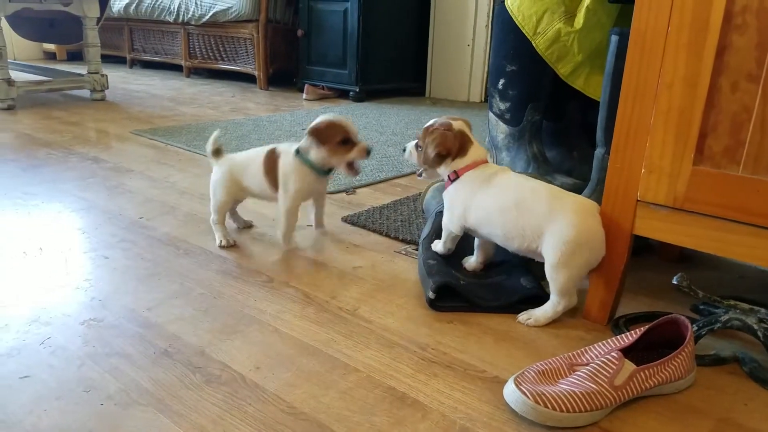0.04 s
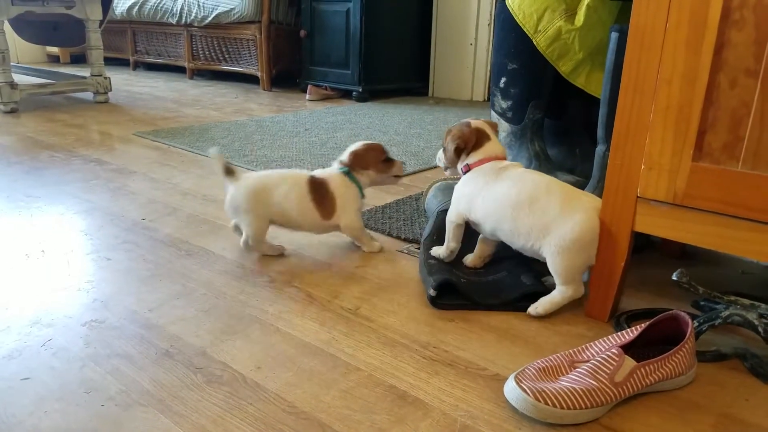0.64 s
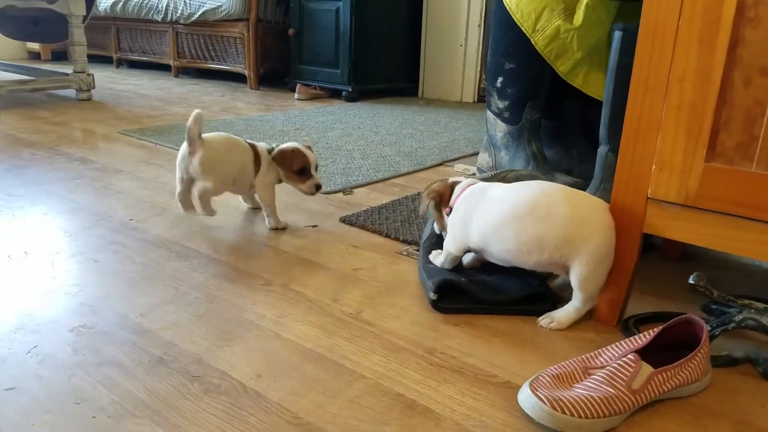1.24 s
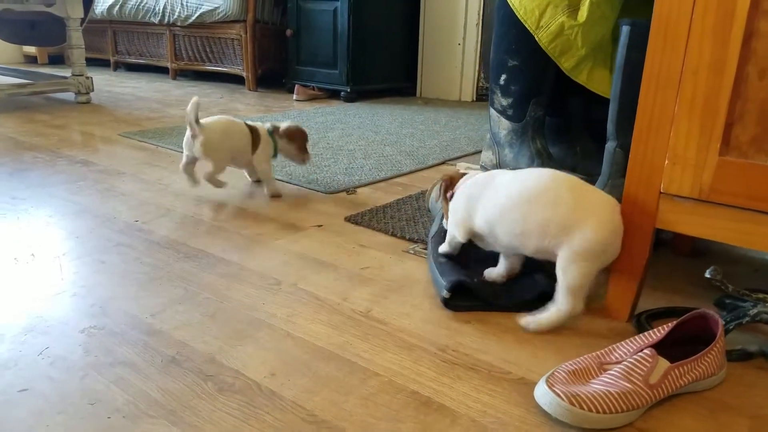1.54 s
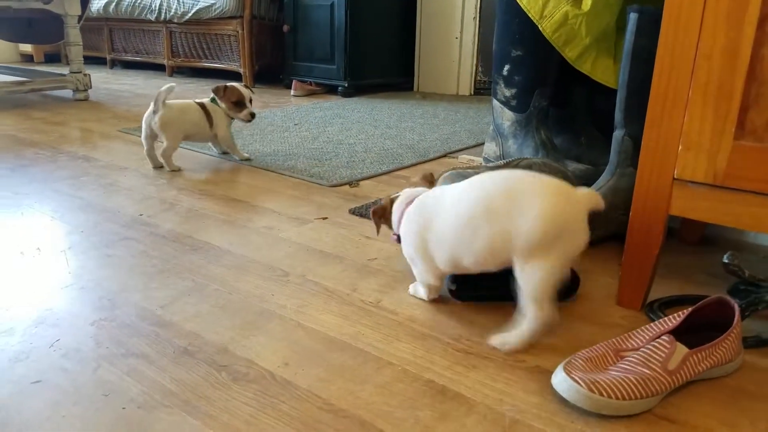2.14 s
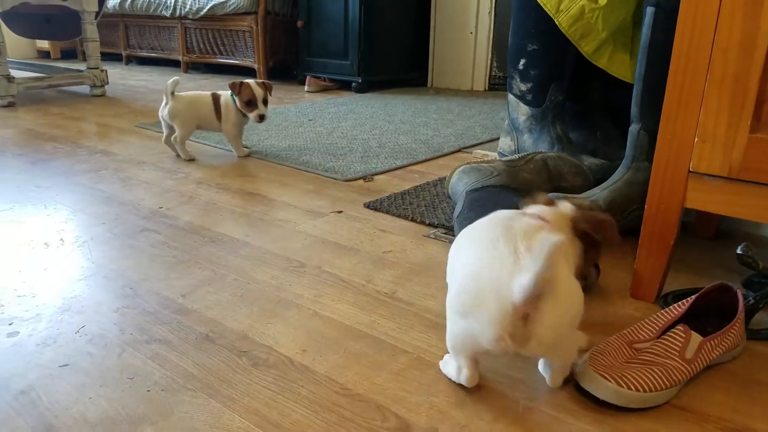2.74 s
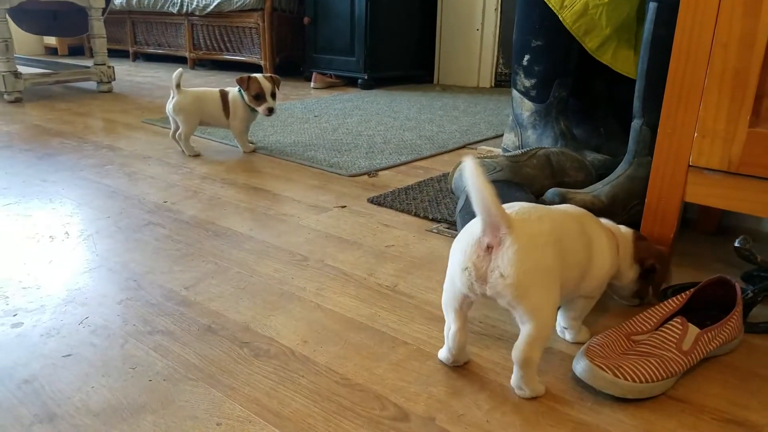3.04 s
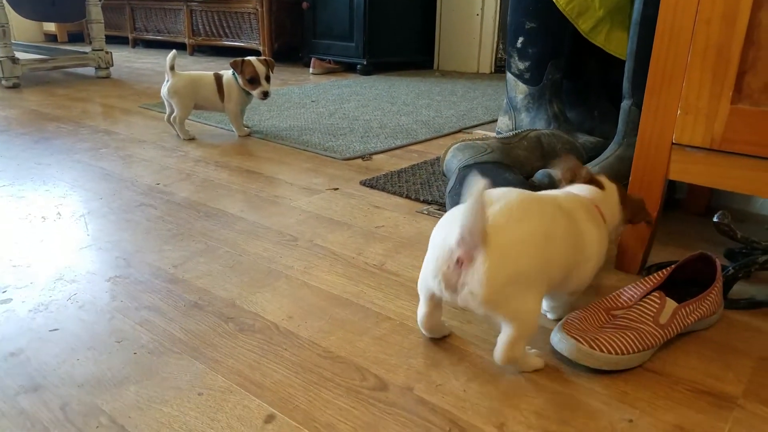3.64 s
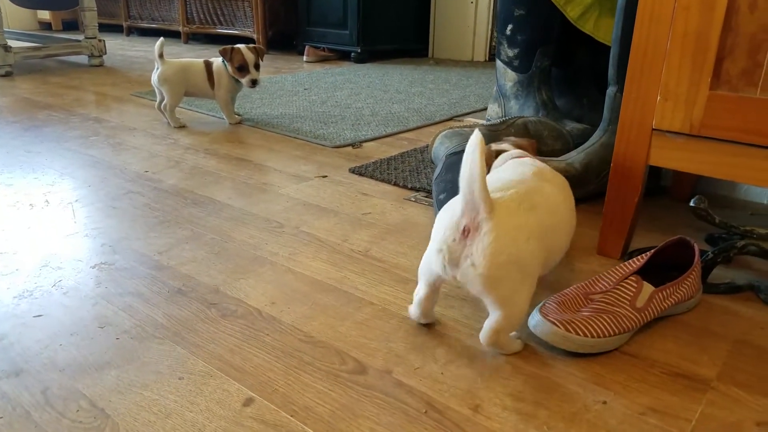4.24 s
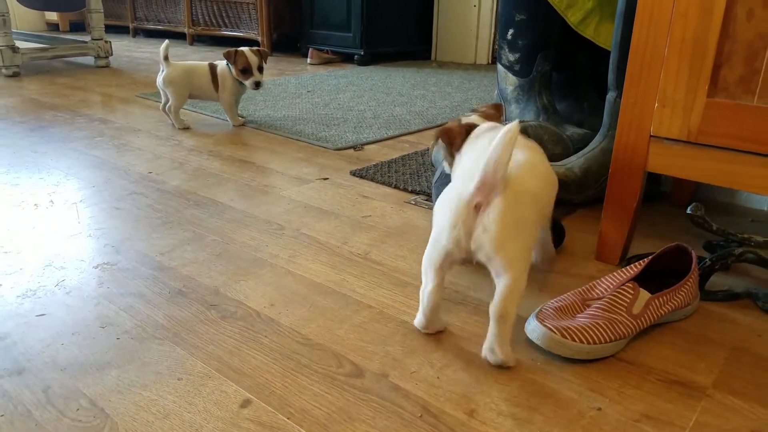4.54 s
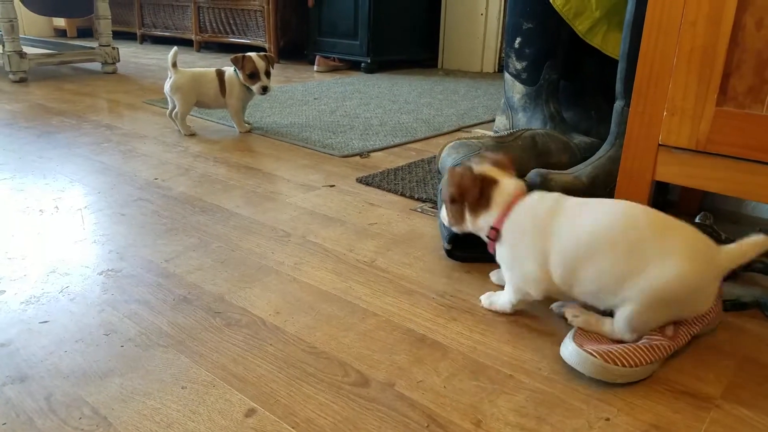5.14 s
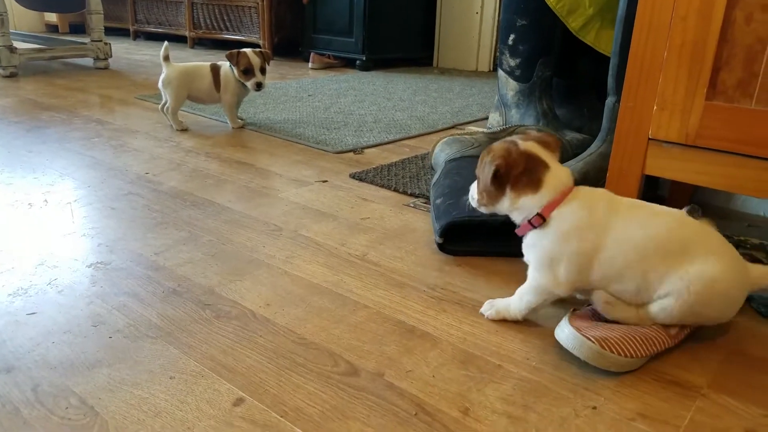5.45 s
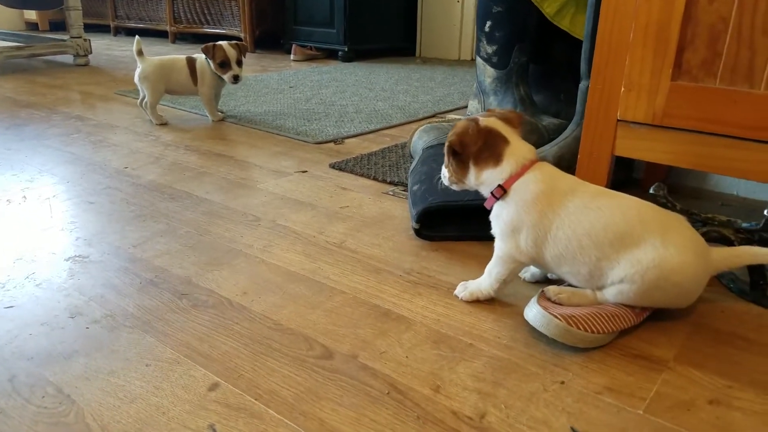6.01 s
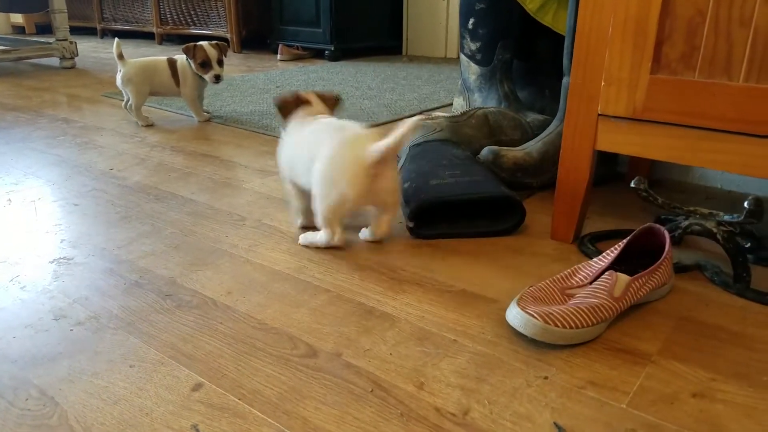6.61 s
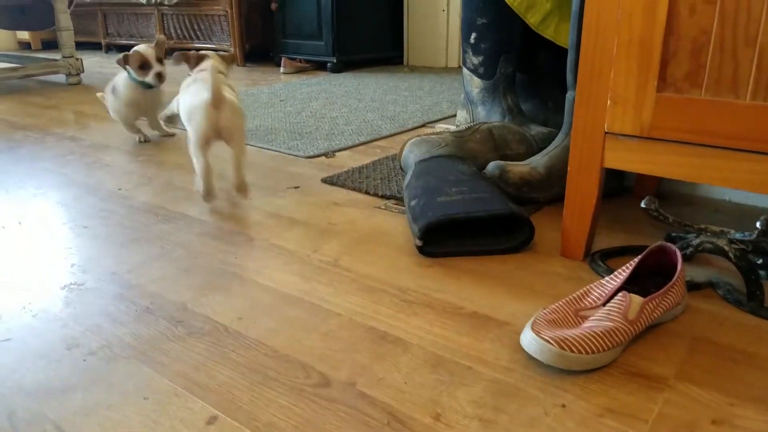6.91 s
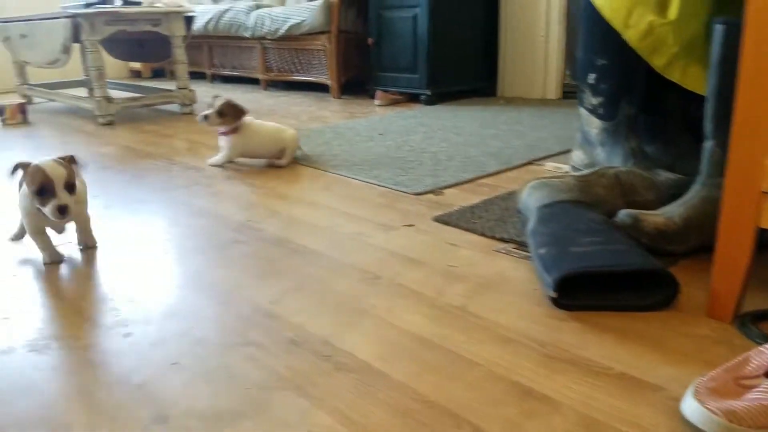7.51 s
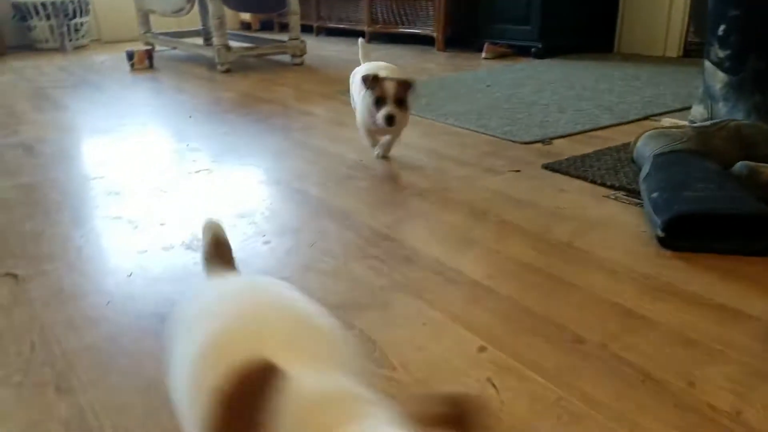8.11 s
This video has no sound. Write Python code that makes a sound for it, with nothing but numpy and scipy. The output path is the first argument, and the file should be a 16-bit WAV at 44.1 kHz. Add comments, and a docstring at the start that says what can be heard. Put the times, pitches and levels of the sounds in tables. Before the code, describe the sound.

Close, uneven paw taps and hollow thuds come from two puppies scuffling on floorboards in a small, faintly humming room. Brief claw scratches and hissy slides fall between the steps, broken by short lulls. Toward the end the puppies run and the pattering grows denser, a collar ring chinks, and clothing or a hand rustles against the microphone in soft swells.

```python
"""Two puppies on a laminate floor

They scuffle, then gallop, in a small room, close to a hand-held phone. Soft paws knock the boards and
make the floating floor boom. Paws and coats slide with a short grainy hiss; claws tick and scratch.
A collar ring chinks. Late on, clothing or a hand on the phone rustles in longer swells.
The room adds a short tail and a faint low hum."""
import sys
import numpy as np
from scipy import signal
from scipy.fft import rfft, irfft, next_fast_len
from scipy.io import wavfile
from scipy.ndimage import map_coordinates

SR = 44100
rng = np.random.default_rng(int(sys.argv[2]) if len(sys.argv) > 2 else 0)


def inscribe(sig):
    """Save sig as 16-bit PCM at rate SR to the path in sys.argv[1].

    A 1-D sig is mono; a 2-D sig holds one channel per row.
    Samples are clipped to [-1, 1] before scaling.
    """
    pcm = np.round(np.clip(np.atleast_2d(sig).T, -1, 1) * 32767)
    wavfile.write(sys.argv[1], SR, pcm.astype(np.int16))


N = 364703
T = np.arange(N) / SR

# Noise spectra. Each row: frequency in Hz, relative density in dB.
HUM_SPECTRUM = [(20, -50), (45, -9), (62, 6.5), (85, -14), (120, 5), (160, -5.5), (310, -3), (520, -8.5),
                (1200, -14.5), (2500, -20.5), (7000, -43), (15000, -29)]
RUSTLE_SPECTRUM = [(150, -13), (550, 20), (1200, 13.5), (2500, 15), (4500, 12.5), (6500, 7), (15000, 1)]
RUMBLE_SPECTRUM = [(20, -39), (42, 14), (85, 10.5), (200, -7), (500, -10.5), (1500, -14)]
CLAW_SPECTRUM = [(150, -34.5), (600, 14.5), (1500, 6.5), (3500, 9), (7500, 2), (15000, -0.5)]
# Bouts of play. Each row: start and end in seconds, rustle in dB, weight on the floor in dB,
# lag of the left microphone port in samples.
PLAY_BOUTS = [(0.153, 0.388, -63.5, -65.5, 12), (0.598, 0.73, -67, -69.5, -3),
              (1.423, 1.672, -63.5, -59, 4.5), (1.76, 1.874, -74, -59.5, 2.5), (2.29, 2.57, -59, -60, 6),
              (3.686, 4.394, -72, -75, -0.5), (4.678, 4.835, -51.5, -56, 8), (5.13, 5.195, -55.5, -59.5, 7),
              (6.37, 6.365, -53, -63, 5), (6.664, 6.68, -52.5, -54.5, 1.5), (7.013, 7.322, -52, -48, -2.5),
              (7.434, 8.29, -54, -51, 8.5)]
# Firm paw falls. Each row: time in seconds, knock level in dB, pitch in Hz, plank decay in cycles.
FIRM_PAWS = [(.142, -33.5, 1170, 1.2), (.323, -36, 990, 1.2), (.56, -37, 780, 0.81), (.726, -46, 486, 2.3),
             (1.2, -50, 472, 1.7), (1.444, -28.5, 468, 1.2), (1.483, -43.5, 564, 4.7),
             (1.62, -32.5, 660, 1.8), (1.648, -49, 775, 1.2), (1.719, -38.5, 490, 0.73),
             (2.265, -29, 740, 1.5), (2.464, -26, 286, 2), (2.494, -39, 760, 0.99), (2.536, -39, 298, 0.7),
             (2.588, -39.5, 303, 0.67), (3.739, -45.5, 334, 0.96), (4.487, -36.5, 376, 0.36),
             (4.697, -34.5, 261, 1.1), (4.74, -28.5, 670, 1.5), (5.101, -32.5, 570, 0.57),
             (5.168, -32, 704, 1.8), (5.319, -59, 196, 1.3), (6.28, -33.5, 189, 0.51),
             (6.61, -30.5, 760, 1.7), (6.644, -26.5, 189, 0.48), (6.672, -36, 655, 2.1),
             (6.688, -27.5, 754, 0.95), (6.85, -35, 535, 3.4), (6.929, -38, 483, 2.2),
             (7.075, -67, 326, 1.2), (7.11, -46, 506, 2.8), (7.204, -27, 532, 5.1),
             (7.432, -36.5, 597, 0.49), (7.649, -43.5, 407, 0.99), (8.018, -32.5, 640, 0.63),
             (8.053, -29, 730, 0.83), (8.056, -27.5, 151, 1.3), (8.083, -35, 535, 2.7),
             (8.109, -30, 674, 0.72), (8.234, -39.5, 483, 2.7), (8.257, -36.5, 750, 1.3)]
# Floating floor modes. Each row: frequency in Hz, relative level in dB, T60 in seconds.
FLOOR_MODES = [(52, -13, 0.23), (78.8, -11, 0.14), (113, -4, 0.096), (137.5, -11, 0.12),
               (174.4, -8.5, 0.17), (201, -16, 0.17), (308, -5.5, 0.041)]
# Hissing swells: short paw and coat slides, and longer rustles of clothing or a hand on the phone.
# Each row: peak time in seconds, level in dB, swell in seconds, hiss centre in Hz.
HISS_SWELLS = [(0.136, -49, 0.008, 2000), (0.193, -48, 0.0073, 7860), (0.366, -50, 0.0096, 5500),
               (.904, -57.5, 0.03, 7200), (1.24, -58.5, 0.024, 7300), (1.475, -55, 0.027, 11900),
               (2.011, -53.5, 0.019, 2290), (2.35, -42, 0.014, 9400), (2.398, -43.5, 0.0048, 5040),
               (2.458, -42.5, 0.0031, 1000), (2.809, -50.5, 0.019, 4900), (2.934, -60, 0.037, 3050),
               (3.77, -49, 0.0088, 3060), (3.908, -54.5, 0.004, 2970), (4.098, -53.5, 0.012, 3360),
               (4.269, -50, 0.014, 3340), (4.545, -53, 0.014, 1140), (4.653, -39, 0.012, 3700),
               (5.013, -43, 0.012, 3520), (5.171, -40, 0.015, 1850), (5.506, -53.5, 0.015, 2080),
               (6.225, -44.5, 0.01, 4440), (6.36, -51, 0.033, 1170), (6.425, -46, 0.011, 1350),
               (6.507, -43.5, 0.0042, 6850), (6.777, -44, 0.0071, 8040), (6.98, -48.5, 0.044, 3300),
               (7.071, -45.5, 0.043, 2560), (7.215, -44.5, 0.037, 4300), (7.371, -50, 0.023, 3800),
               (7.576, -51.5, 0.04, 4400), (7.775, -47, 0.039, 2800), (7.962, -44, 0.043, 9400)]
# Claw strikes. Each row: start in seconds, level in dB, length in seconds, added tilt in dB per octave.
CLAW_STRIKES = [(0.292, -51, 0.0042, -2), (.32, -46, 0.004, 1), (0.455, -52, 0.0025, 6),
                (1.433, -48, 0.0011, 1), (2.09, -41.5, 0.0077, 1), (2.242, -40.5, 0.00089, 0.9),
                (2.2627, -31.5, 0.0019, 2.5), (2.492, -35, 0.0033, -0.5), (2.673, -55.5, 0.0035, 2),
                (2.839, -44.5, 0.0037, 1.6), (3.047, -59.5, 0.01, 0.5), (3.861, -51, 0.0017, 1.5),
                (4.486, -41.5, 0.0041, 0), (4.66, -35, 0.0047, 6.5), (4.776, -39.5, 0.0039, 1.5),
                (5.197, -39, 0.0042, 5.5), (5.557, -48, 0.0068, 0.5), (6.275, -38.5, 0.0029, 0),
                (6.605, -30.5, 0.0024, 5.5), (6.716, -45, 0.0069, 4), (6.864, -49, .003, 0),
                (7.165, -42, .004, 0), (7.263, -38.5, 0.0015, -0.5), (7.5194, -44, 0.0012, 2.5),
                (7.8596, -41.5, 0.0062, -0.4), (7.918, -41, 0.0055, 0), (7.954, -42, 0.0015, -0.5),
                (8.001, -31.5, 0.012, 10), (8.0132, -32, 0.0048, 6.5), (8.111, -38, 0.0017, 1),
                (8.131, -38.5, 0.0027, .5), (8.226, -44.5, 0.0055, 0)]
# Collar ring jolts. Each row: start in seconds, level in dB.
COLLAR_CHINKS = [(6.78, -59), (7.714, -34)]
# Colour of the two ports. Each row: frequency in Hz, left minus right in dB.
PORT_COLOUR = [(200, -1), (700, 0.5), (2380, -1.5), (4400, 4), (8120, 1), (15000, 1.5)]


def amp(db):
    """Decibels to gain."""
    return 10 ** (np.asarray(db) / 20)


def unit(x):
    """Scale to rms 1."""
    return x / np.sqrt(np.mean(x ** 2))


def decay(t, t60_s):
    """Fall of 60 dB per t60_s."""
    return np.exp(-np.log(1000) * t / t60_s)


def add(track, start_s, sound):
    """Mix a sound into a track."""
    i = int(start_s * SR)
    sound, i = sound[max(-i, 0):], max(i, 0)
    track[i:i + len(sound)] += sound[:N - i]


def curve_db(points, size):
    """(Hz, dB) points to FFT bins, over log frequency."""
    hz, db = np.transpose(points)
    bin_hz = np.maximum(np.arange(size // 2 + 1) * SR / size, 1)
    return np.interp(np.log(bin_hz), np.log(hz), db)


def colour(x, spectrum):
    """Shape noise by (Hz, dB) points, to rms 1."""
    n = x.shape[-1]
    size = next_fast_len(n)
    return unit(irfft(rfft(x, size) * amp(curve_db(spectrum, size)), size)[..., :n])


def diffuse(n, apart_hz=1100):
    """Noise from all sides at two close ports: alike in the bass, unrelated in the treble."""
    mid, side = rfft(rng.standard_normal((2, n)))
    hz = np.arange(len(mid)) * SR / n
    coherence = .94 / (1 + (hz / apart_hz) ** 2)
    mid, side = mid * np.sqrt(1 + coherence), side * np.sqrt(1 - coherence)
    return irfft([mid + side, mid - side], n) / np.sqrt(2)


def friction(n, grain_db, grain_hz=700):
    """Tiny catches and slips: noise whose level jumps from grain to grain."""
    grain = (np.arange(n) * grain_hz / SR).astype(int)
    return unit(rng.standard_normal(n) * amp(grain_db * rng.standard_normal(n))[grain])


def activity(at_s, rest_db=-76.5, attack_s=.07, release_s=.18):
    """Rustle and weight in dB: each bout starts quickly and ebbs to rest."""
    start_s, end_s, rustle_db, weight_db, _ = np.transpose(PLAY_BOUTS)
    t = np.asarray(at_s)[..., None]
    envelope = np.exp(-np.maximum(start_s - t, 0) / attack_s - np.maximum(t - end_s, 0) / release_s)
    return [20 * np.log10(amp(rest_db) + (amp(db) * envelope).max(axis=-1))
            for db in (rustle_db, weight_db)]


def hum(level_db=-62.5):
    """Steady low room noise from all sides."""
    return amp(level_db) * colour(diffuse(N), HUM_SPECTRUM)


def scurry(rustle_gain_db=2, rumble_gain_db=-5.5, patter_db=3, tremble_db=5.5):
    """Pattering and brushing coats rustle between steps and keep the floor trembling."""
    rustle_db, weight_db = activity(T)
    knots_s = np.arange(0, T[-1], .025)
    patter = np.interp(T, knots_s, rng.standard_normal(len(knots_s)))
    grains = np.array([friction(N, grain_db=2, grain_hz=302.7) for _ in "LR"])
    rustle = colour(grains, RUSTLE_SPECTRUM) * amp(rustle_gain_db + patter_db * patter)
    rumble = colour(diffuse(N), RUMBLE_SPECTRUM) * amp(rumble_gain_db + tremble_db * patter)
    return amp(rustle_db) * rustle + amp(weight_db) * rumble


def footfalls(steps_per_s=12, step_hz=430, spread_db=7.5, spread_octaves=.61):
    """Firm falls plus irregular light steps. Each row: seconds, knock dB, Hz, decay cycles, boom dB."""
    count = int(steps_per_s * T[-1])
    jitter, force, pitch = rng.standard_normal((count, 3)).T
    light_s = np.clip((np.arange(count) + jitter / 2) / steps_per_s, 0, T[-1])
    rustle_db, _ = activity(light_s)
    light_hz = step_hz * 2 ** (spread_octaves * pitch)
    light = np.transpose([light_s, rustle_db + spread_db * force, light_hz, np.ones(count)])
    at_s, knock_db, hz, cycles = np.vstack([FIRM_PAWS, light]).T
    _, weight_db = activity(at_s)
    # Harder, heavier and lower-pitched falls boom more.
    boom_db = 2 + .31 * knock_db + .53 * weight_db - 2 * np.log2(hz / step_hz)
    boom_db[len(FIRM_PAWS):] -= .5  # light steps carry less weight
    return np.transpose([at_s, knock_db, hz, cycles, boom_db])


def knocks(paws, overtone_db=-9, overtone_ratio=2.02, give_db=-7, give_hz=170, rise_cycles=.46):
    """A pad loads the plank, which gives once and knocks; loose spots ring longer than firm ones."""
    out, t = np.zeros(N), np.arange(-SR // 50, SR // 12) / SR
    give = np.exp(-(give_hz * t / .17) ** 2) * np.sin(-2 * np.pi * give_hz * t)
    for at_s, db, hz, decay_cycles, _ in paws:
        detune, phase = rng.standard_normal(2)
        cycles = hz * t
        envelope = np.exp(-np.where(cycles < 0, (cycles / rise_cycles) ** 2, cycles / decay_cycles))
        overtone = envelope ** 2 * np.cos(2 * np.pi * cycles * overtone_ratio * amp(detune) + phase)
        knock = envelope * np.cos(2 * np.pi * cycles) + amp(overtone_db) * overtone
        add(out, at_s + t[0], amp(db) * (knock + amp(give_db) * give))
    return out


def booms(paws, spread_db=3, detune=.08, push_s=.0029):
    """Each step's weight sets the floor swinging; every spot favours other modes."""
    out, t = np.zeros(N), np.arange(SR // 2) / SR
    hz, mode_db, t60_s = np.transpose(FLOOR_MODES)[:, :, None]
    push = 1 - np.exp(-t / push_s)
    for at_s, _, _, _, boom_db in paws:
        strength, shift, phase = rng.standard_normal((3, len(FLOOR_MODES), 1))
        swing = np.sin(2 * np.pi * hz * (1 + detune * shift) * t + 2 * phase)
        modes = amp(mode_db + spread_db * strength) * decay(t, t60_s) * swing
        add(out, at_s - push_s, amp(boom_db) * push * modes.sum(axis=0))
    return out


def hiss_swells(stop_ratio=.33, resonance_db=2.5):
    """Paw, coat, clothing or hand rubs: hiss swells with speed, stops faster, has chance resonances."""
    out, t = np.zeros(N), np.arange(-SR // 6, SR // 6) / SR
    bands_hz = np.geomspace(100, 16000, 30)
    for peak_s, db, swell_s, centre_hz in HISS_SWELLS:
        width_s = np.where(t < 0, swell_s, stop_ratio * swell_s)
        speed = np.exp(-np.abs(t / width_s) ** 1.6 / 2)
        octaves = np.log2(bands_hz / centre_hz)
        hump_db = np.interp(octaves, [-5, -1.6, -.5, .4, 1.5, 3.3], [-15, -7, 0, 0, -11.5, -20])
        bands_db = hump_db + resonance_db * rng.standard_normal(len(bands_hz))
        hiss = colour(friction(len(t), grain_db=3.5), np.transpose([bands_hz, bands_db]))
        add(out, peak_s + t[0], amp(db) * speed * hiss)
    return out


def claws(release_s=.0034, tick_db=1, tick_s=.0005, glancing_s=.004):
    """A nail ticks, then catches the hard surface in a dry snap; long, glancing ones land softly."""
    out, t = np.zeros(N), np.arange(-SR // 500, SR // 20) / SR
    hz, base_db = np.transpose(CLAW_SPECTRUM)
    for start_s, db, length_s, tilt_db_per_octave in CLAW_STRIKES:
        tick = amp(tick_db) * np.exp(-np.abs(t) / tick_s - (length_s / glancing_s) ** 2)
        scratch = np.exp(-np.maximum(t - length_s, 0) / release_s)
        contact = (t >= 0) * (scratch + tick)
        spectrum = np.transpose([hz, base_db + tilt_db_per_octave * np.log2(hz / hz[0])])
        snap = colour(contact * friction(len(t), grain_db=4, grain_hz=2644), spectrum)
        add(out, start_s + t[0], amp(db) * np.sqrt(np.mean(contact ** 2)) * snap)
    return out


def collar(ring_hz=3934, t60_s=.19):
    """A jolted metal ring sounds one thin note."""
    out, t = np.zeros(N), np.arange(SR // 2) / SR
    for start_s, db in COLLAR_CHINKS:
        add(out, start_s, amp(db) * decay(t, t60_s) * np.sin(2 * np.pi * ring_hz * t))
    return out


def ports(x, pass_s=8.015, pass_width_s=.025, pass_left_db=1.5):
    """Direct sound reaches the nearer port first; the left is louder as a puppy brushes past."""
    start_s, end_s, _, _, bout_lag_samples = np.transpose(PLAY_BOUTS)
    lag_samples = np.interp(T, (start_s + end_s) / 2, bout_lag_samples)
    left_db = pass_left_db * np.exp(-((T - pass_s) / pass_width_s) ** 2)
    left = amp(left_db / 2) * map_coordinates(x, [np.arange(N) - lag_samples / 2], order=3)
    right = amp(-left_db / 2) * map_coordinates(x, [np.arange(N) + lag_samples / 2], order=3)
    return np.array([left, right])


def room(x, split_hz=850, low_t60_s=.35, high_t60_s=.17, low_db=-.5, build_s=.000073, stride_s=.2):
    """Walls and furniture return a short diffuse tail, treble dying first; new pattern each stride."""
    out, hop, t = np.zeros((2, N)), int(stride_s * SR), np.arange(SR // 3) / SR
    lowpass, highpass = (signal.butter(2, split_hz, kind, fs=SR, output="sos")
                         for kind in ("low", "high"))
    build = 1 - np.exp(-t / build_s)
    padded = np.pad(x, (hop, 2 * hop))
    window = np.sin(np.pi * np.arange(2 * hop) / (2 * hop))
    for i in range(0, N + hop, hop):
        noise = diffuse(len(t))
        lows = amp(low_db) * decay(t, low_t60_s) * signal.sosfilt(lowpass, noise)
        highs = decay(t, high_t60_s) * signal.sosfilt(highpass, noise)
        response = unit(build * (lows - highs)) / np.sqrt(len(t))
        wet = signal.fftconvolve((window * padded[i:i + 2 * hop])[None], response, axes=1)
        for channel, sound in zip(out, wet):
            add(channel, (i - hop) / SR, sound)
    return out


def scene():
    """Steps, scratches and hisses, direct and through the room, with collar, scurry and hum."""
    paws = footfalls()
    knock, boom, claw, hiss = knocks(paws), booms(paws), claws(), hiss_swells()
    direct = ports(knock + boom + claw + hiss + collar())
    tail = room(amp(-8.5) * knock + amp(-3) * boom + amp(-6.5) * claw + hiss)
    return direct + tail + scurry() + hum()


def record(dry, low_cut_hz=30, port_hz=14200, port_db=-3, port_q=3, top_hz=15900):
    """Phone: deep bass dropped, ports ringing in the high treble, each with its own colour, top cut."""
    lean = signal.sosfilt(signal.butter(2, low_cut_hz, "high", fs=SR, output="sos"), dry)
    bright = lean + amp(port_db) * signal.lfilter(*signal.iirpeak(port_hz, port_q, fs=SR), lean)
    size = next_fast_len(N)
    left_db = curve_db(PORT_COLOUR, size)
    coloured = irfft(rfft(bright, size) * amp([left_db / 2, -left_db / 2]), size)[:, :N]
    return signal.sosfilt(signal.ellip(10, .2, 70, top_hz, fs=SR, output="sos"), coloured)


dry = scene()
out = record(dry)
inscribe(out)
```